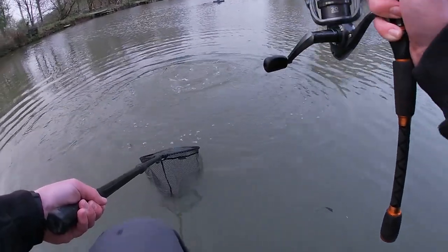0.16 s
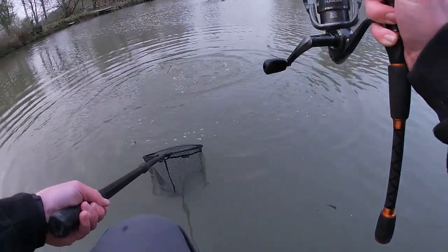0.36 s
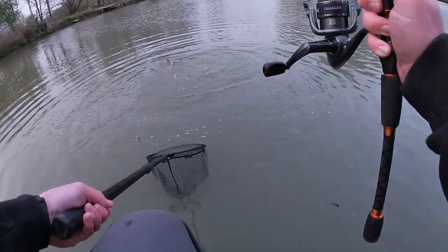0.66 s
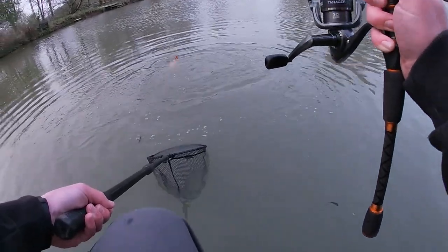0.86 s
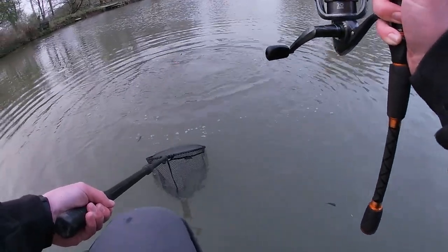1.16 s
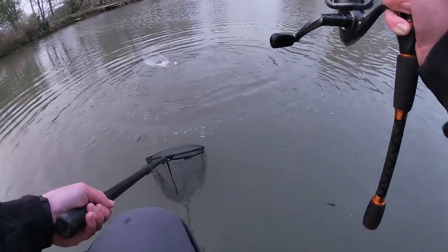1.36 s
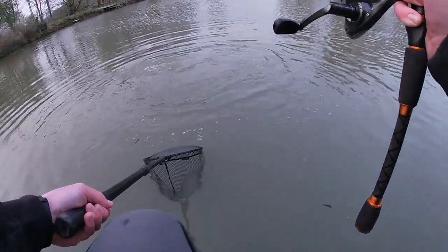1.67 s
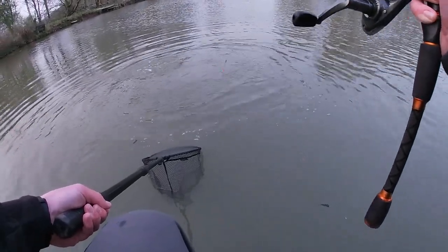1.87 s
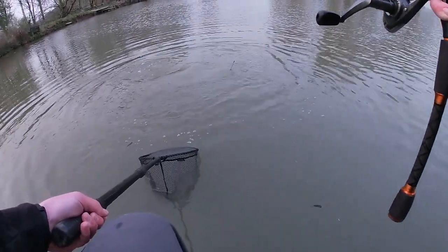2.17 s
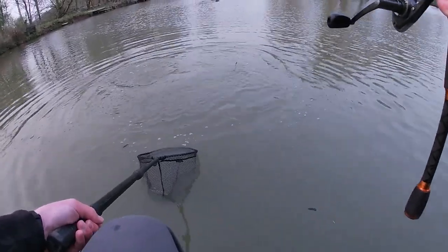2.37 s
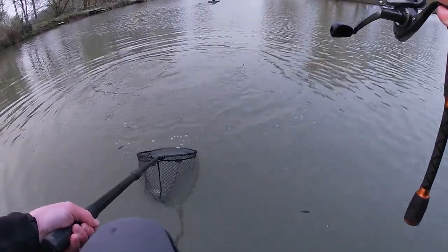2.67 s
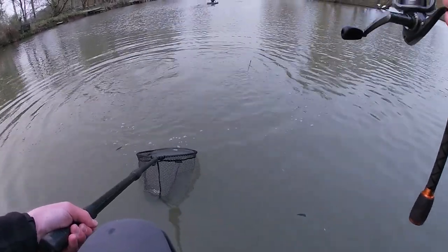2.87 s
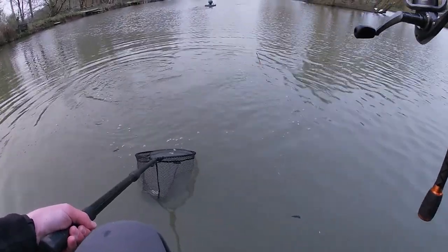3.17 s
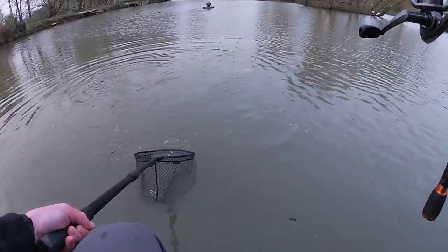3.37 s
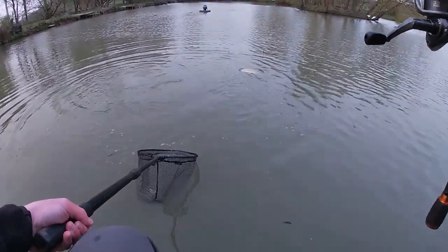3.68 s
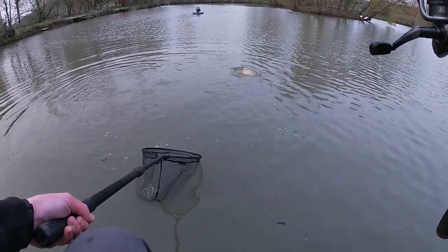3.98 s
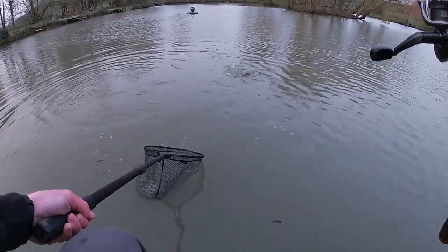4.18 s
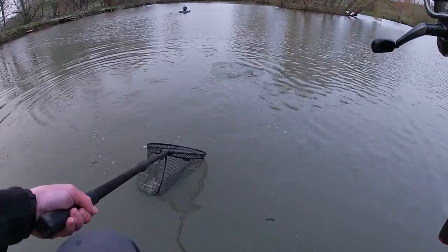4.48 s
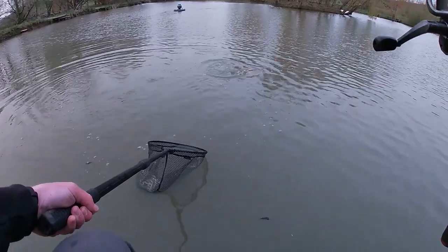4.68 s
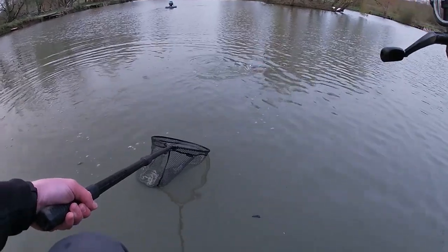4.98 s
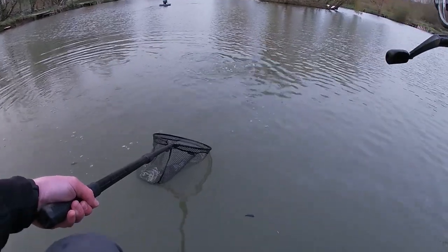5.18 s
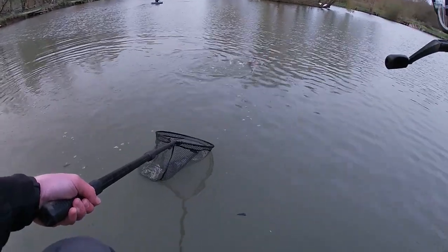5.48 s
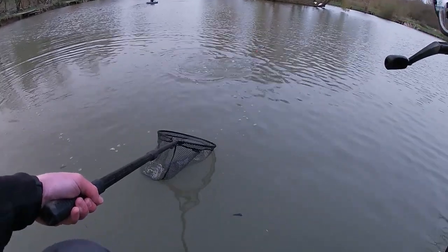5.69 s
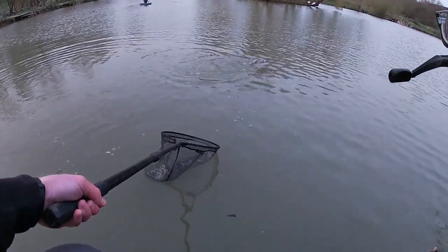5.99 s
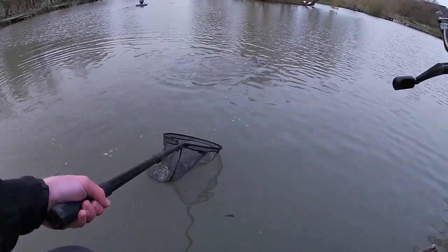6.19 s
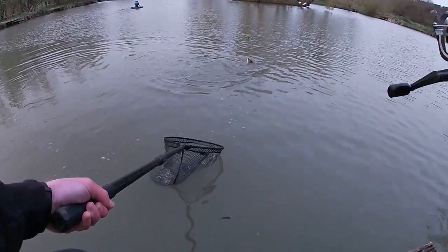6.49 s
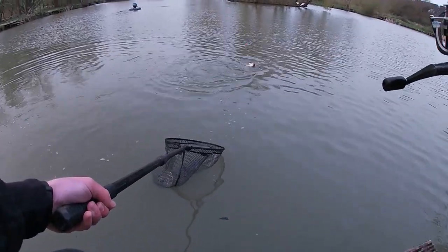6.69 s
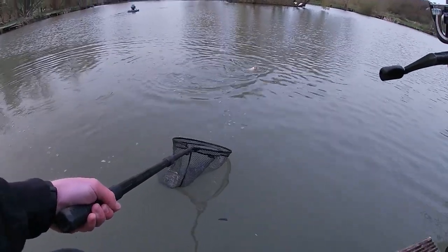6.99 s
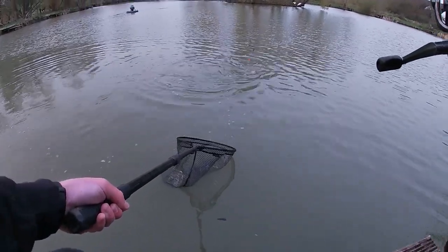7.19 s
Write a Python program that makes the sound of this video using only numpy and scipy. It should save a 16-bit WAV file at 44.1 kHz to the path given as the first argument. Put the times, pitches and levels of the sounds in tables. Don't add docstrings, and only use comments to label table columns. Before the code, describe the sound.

A lakeside heard from a chest-worn microphone, with a low, steady rumble of far traffic, soft tyre roar, wavering engine drones and a very faint electronic ticking. At 0-0.3 s light flicks throw bright spray and pattering droplets, thinning to a few drops. A mild breeze presses around 1.1 s. At 1.4-1.7 s the fish rolls: a heavy wet slosh, churn and low bubbly gulps, then ripples fade. From 1.75 to 3.9 s it is calm, with faint, quick, high warbler whistles and a soft wind push near 2.5 s. At 4.05-4.15 s sharp flat slaps crack out, followed by droplets and plunks at 4.5 and 4.8 s. The reel drag purrs quietly at 4.9-5.2 s. More splashes follow, with a deep hollow plop at 5.5 s. From 5.9 s drips dwindle, a distant thrush calls, and strong gusts flutter and thump the microphone, strongest at 6.2-6.5 s, easing by 7.3 s.

```python
import sys
import numpy as np
from scipy import signal
from scipy.fft import rfft, irfft, next_fast_len
from scipy.io import wavfile
from scipy.ndimage import uniform_filter1d, map_coordinates

SR = 44100
rng = np.random.default_rng(int(sys.argv[2]) if len(sys.argv) > 2 else 0)


def makeup_ratio(level_db):
    decades = np.asarray(level_db, float) / 20
    return 10 ** decades


def store_wav(level_fs):
    pcm = np.round(np.clip(np.atleast_2d(level_fs), -1, 1) * 32767)
    wavfile.write(sys.argv[1], SR, pcm.T.astype(np.int16))


N = 323694


def unit(x):
    return x / np.sqrt(np.mean(x ** 2) + 1e-20)


def curves(rows, silent=-120):
    s, *cols = np.transpose(rows)
    return [np.interp(np.arange(N) / SR, s, c, silent, silent) for c in cols]


def wobble(rate_hz):
    knots = rng.standard_normal(int(N * rate_hz / SR) + 4)
    return map_coordinates(knots, [np.arange(N) * rate_hz / SR])


def coloured(x, spectrum):
    m = 2 * next_fast_len(N // 2 + 4096)
    f, db = np.transpose(spectrum)
    log_f = np.log(np.fft.rfftfreq(m, 1 / SR) + 1)
    gain = makeup_ratio(np.interp(log_f, np.log(f + 1), db))
    cepstrum = irfft(np.log(gain + 1e-6), m)
    cepstrum[1:m // 2] *= 2
    cepstrum[m // 2 + 1:] = 0
    response = np.exp(rfft(cepstrum))
    return unit(irfft(rfft(x, m) * response, m)[:N])


def rush(spectrum, patchy_db):
    z = signal.stft(rng.standard_normal(N), nperseg=512)[2]
    field = uniform_filter1d(rng.standard_normal(z.shape), 5, 0)
    field = uniform_filter1d(field, 10, 1)
    noise = signal.istft(z * makeup_ratio(patchy_db * unit(field)), nperseg=512)[1][:N]
    return coloured(noise, spectrum)


def bubbles(s, size, hz, t60, rise, onset, length):
    t = np.arange(length) / SR
    life = np.abs(t60)[:, None] + 1e-4
    phase = 2 * np.pi * hz[:, None] * (t + rise * t * t / life)
    swell = 1 - np.exp(-t * hz[:, None] / onset)
    ring = size[:, None] * np.sin(phase) * makeup_ratio(-60 * t / life) * swell
    at = np.round(s * SR).astype(int)[:, None] + np.arange(length)
    return np.bincount(at.ravel(), ring.ravel(), N + length)[:N]


def fizz(spectrum, count, hz, cycles, spread_db, wash, length):
    u = rng.random(count)
    z = rng.standard_normal((count, 2))
    e = rng.exponential(size=count)
    pitch = np.clip(hz * np.exp(0.522 * z[:, 0]), 100, 15000)
    t60 = cycles / pitch * np.exp(0.36 * z[:, 1])
    size = makeup_ratio(spread_db * np.minimum(e, 3))
    swarm = bubbles(u * N / SR, size, pitch, t60, 0.33, 1.37, length)
    return coloured(unit(swarm) + wash * rng.standard_normal(N), spectrum)


def swells(s, length, db, rise, fall):
    t = np.arange(0, N + 32, 32)[None] / SR - np.asarray(s)[:, None]
    hold = np.abs(length)[:, None]
    before = np.maximum(-t, 0) / (rise + 0.35 * hold)
    after = np.maximum(t - hold, 0) / (fall + hold)
    level_db = np.asarray(db)[:, None] - 20 * (before + after)
    gain = np.sqrt(np.sum(makeup_ratio(2 * level_db), axis=0))
    return np.interp(np.arange(N) / 32, np.arange(len(gain)), gain)


def echoes(x, t60):
    tail = rng.standard_normal(SR // 2) * makeup_ratio(-60 * np.arange(SR // 2) / SR / t60)
    return signal.fftconvolve(np.pad(x, (600, 0)), tail / np.linalg.norm(tail))[:N]


# t/s, level/dB
ROAD = [(0, -54), (0.8, -56.5), (1.2, -60.5), (2.1, -60), (2.6, -56.5), (3.3, -59), (4.65, -57.5),
        (5.9, -54.5), (6.8, -62), (7.1, -56), (7.34, -58)]
# f/Hz, level/dB per Hz
RUMBLE = [(24, -21.5), (40, -10.5), (76, -5), (108, -6.5), (151, -5.5), (244, -11.5), (277, -15.5),
          (650, -33), (840, -51), (1430, -120)]
ROAR = [(260, -29.5), (450, -34.5), (670, -5), (880, -1), (1600, -3.5), (2580, -19), (2900, -22.5),
        (3770, -59), (6380, -120)]
HISS = [(1470, -14), (2500, -43.5), (2630, -10), (2950, -7), (4290, -5), (6110, -1.5), (8450, -17.5),
        (10000, -15.5), (14000, -33.5)]
# t/s, f/Hz, level/dB
ENGINES = [
    [(0, 77.95, -45), (1.3, 72.7, -44.5), (2.0, 76.8, -50), (3.2, 75.2, -63)],
    [(1.9, 163.4, -53.5), (2.6, 162.6, -60.5), (3.6, 145.7, -54), (4.6, 160.4, -51.5), (5.7, 164.4, -57)],
]


def road():
    roar_db, = curves(ROAD)
    leaving = makeup_ratio(-66 - 5.5 * np.arange(N) / SR)
    rumble_gain = np.hypot(makeup_ratio(-46.5), makeup_ratio(18) * leaving)
    hiss_gain = np.hypot(makeup_ratio(-74), leaving)
    far = rumble_gain * rush(RUMBLE, patchy_db=0.5)
    far += makeup_ratio(roar_db) * rush(ROAR, patchy_db=1.5)
    far += hiss_gain * makeup_ratio(0.8 * wobble(30)) * rush(HISS, patchy_db=0.5)
    for hz, db in map(curves, ENGINES):
        gain = makeup_ratio(db + 3 + 3 * wobble(10))
        unsteady_hz = hz * (1 + 0.022 * wobble(10))
        far += gain * np.sin(2 * np.pi * np.cumsum(unsteady_hz) / SR)
    return far


# t/s, level/dB
BREEZE = [(0, -66), (0.9, -51), (1.15, -41.5), (1.6, -62), (2.2, -60), (2.45, -43), (2.65, -48), (3.2, -68),
          (5.4, -57), (5.85, -43.5), (6.6, -37), (7.34, -52)]
# f/Hz, level/dB per Hz
BUFFET = [(8.8, -36.5), (15, -2.5), (59, 0.5), (118, -5), (140, -24.5), (178, -10), (250, -37.5),
          (320, -52), (550, -120)]
FLUTTER = [(82, -36.5), (140, 4.5), (214, -8), (248, -7), (700, -39.5), (910, -62), (1540, -120)]
# t/s, length/s, buffet level/dB, flutter over buffet/dB
PUFFS = [(5.916, 0.054, -35, -7.5), (6.083, 0.011, -51, 7), (6.192, 0.11, -28.5, -3),
         (6.431, 0.013, -34, -1.5), (6.488, 0.069, -28, -8), (6.814, 0.0028, -32, 1), (6.89, 0.1, -40, -6),
         (7.067, 0.0075, -41, -23)]
# t/s, peak level/dB, f/Hz
THUMPS = [(6.175, -23, 111), (6.213, -21, 124), (6.231, -22, 90), (6.279, -28, 71), (6.362, -25.5, 85),
          (6.428, -27.5, 212), (6.462, -20, 62), (6.518, -18, 68), (6.644, -30, 150), (6.795, -34, 111),
          (6.816, -28, 170)]


def wind():
    s, length, db, sharp_db = np.transpose(PUFFS)
    buffet_gain = np.hypot(swells(s, length, db, rise=0.038, fall=0.026), makeup_ratio(curves(BREEZE)[0]))
    eddies = makeup_ratio(1.3 * wobble(13)) * rush(BUFFET, patchy_db=1.0)
    push = eddies ** 2
    lumps = unit(eddies + 0.095 * (push - uniform_filter1d(push, size=2000)))
    flaps = unit(makeup_ratio(4.5 * wobble(40)) * rush(FLUTTER, patchy_db=-0.5))
    flap_gain = swells(s, length / 2, db + sharp_db, rise=0.022, fall=0.032)
    at, peak_db, hz = np.transpose(THUMPS)
    thumps = bubbles(at, makeup_ratio(peak_db + 3.5), hz, 6.9 / hz, rise=-0.1, onset=0.23, length=5000)
    return thumps + buffet_gain * lumps + flap_gain * flaps


# f/Hz, level/dB per Hz
CHURN = [(110, -24), (180, -20), (371, -7), (405, -2.5), (453, -10), (800, -26), (1040, -77), (1760, -120)]
SLOSH = [(250, -23), (520, -8.5), (861, -15.5), (1540, -6), (2150, -9), (2570, -21), (2700, -8.5),
         (3510, -70), (5940, -120)]
SPRAY = [(1470, -47), (2500, -13), (2580, -31), (2850, -10.5), (3190, -4), (3870, -14), (5210, -13.5),
         (6070, -6.5), (6910, -18.5), (10100, -25.5), (11400, -35), (14200, -39), (15500, -41.5)]
# t/s, length/s, slosh level/dB, spray over slosh/dB
FLICKS = [(0.004, 0.019, -46.5, -6), (0.043, 0.058, -50.5, 6), (0.144, 0.021, -45.5, -3.5),
          (1.379, 0.0064, -54, -18), (1.45, 0.021, -32.5, -18.5), (1.475, 0.036, -36, -7.5),
          (1.564, 0.039, -37.5, -6.5), (1.63, 0.046, -46, -3.5), (1.734, 0.024, -56, -1),
          (4.061, 0.011, -34, -17.5), (4.05, .003, -39, -13), (4.095, 0.0055, -33, -5),
          (4.135, 0.0039, -37, -2.5), (4.153, 0.002, -35.5, -2.5), (4.2, 0.0033, -69, -1),
          (4.298, 0.053, -56, -2), (4.431, 0.0069, -46, -9), (4.469, 0.0022, -62, 9),
          (4.796, 0.065, -46, -11), (5.118, 0.053, -46.5, -6.5), (5.258, 0.0055, -53, -11),
          (5.289, 0.0024, -55.5, 13.5), (5.471, 0.0056, -35.5, -10), (5.504, 0.071, -44.5, -12),
          (5.634, 0.022, -51, 0.5)]
# t/s, length/s, churn level/dB
ROLLS = [
    (1.476, 0.058, -34.5),
    (1.574, 0.027, -43.5),
]


def thrashing():
    rise_s, fall_s, ripple_fall_s = 0.005, 0.02, 0.66
    s, length, db, bright_db = np.transpose(FLICKS)
    ripples = swells(s, length, -60 + 0 * db, rise_s, ripple_fall_s)
    slosh_gain = np.hypot(swells(s, length, db, rise_s, fall_s), ripples)
    spray_gain = np.hypot(swells(s, length, db + bright_db, rise_s, fall_s), makeup_ratio(-5) * ripples)
    churn = makeup_ratio(-3) * swells(*np.transpose(ROLLS), rise=0.005, fall=0.05)
    churn *= fizz(CHURN, count=800, hz=450, cycles=20, spread_db=1.2, wash=1.2, length=2500)
    slosh = slosh_gain * makeup_ratio(-2.5 + 1.5 * wobble(60))
    slosh *= fizz(SLOSH, count=4500, hz=1500, cycles=16, spread_db=2.5, wash=1.3, length=600)
    spray = spray_gain * makeup_ratio(-2.5 + 2 * wobble(70))
    spray *= fizz(SPRAY, count=10000, hz=5000, cycles=16, spread_db=3.5, wash=0.9, length=220)
    return churn + slosh + spray


# t/s, peak level/dB, f/Hz
GLINTS = [(0.0114, -62, 9560), (0.1204, -41, 9720), (0.138, -44, 9740), (0.1724, -52, 9990),
          (0.191, -44, 9420), (0.2204, -59, 9400), (0.4714, -65, 9630), (1.1383, -58, 9530),
          (4.4124, -74, 9770), (4.585, -69, 9730), (5.0135, -64, 9450), (5.1317, -53, 9880),
          (5.2535, -53, 9810), (5.5787, -59, 9280), (5.6705, -59, 9780), (5.7229, -63, 9830),
          (5.7394, -63, 9820), (5.9324, -57, 10100), (6.0427, -68, 9840)]
# t/s, peak level/dB, f/Hz
PATTER = [(0.015, -41.5, 3540), (0.071, -31, 3260), (0.139, -35, 5900), (0.171, -38, 5700),
          (0.281, -44, 2940), (0.351, -45, 2980), (0.457, -49, 3060), (1.175, -46.5, 1830),
          (4.822, -45, 5400), (5.424, -48, 6700),
          (1.3724, -34, 5300), (1.3934, -38.5, 3150), (1.46, -37, 3440), (1.4723, -24.5, 3140),
         (1.5524, -31, 3160), (1.568, -28, 3260), (1.6217, -35, 2850), (1.879, -48, 3800),
         (4.079, -29, 3560), (4.1001, -20.5, 3070), (4.1322, -30, 3380), (4.3018, -29, 2790),
         (4.453, -40, 3440), (4.477, -30, 2730), (4.645, -41.5, 4280), (4.7912, -40.5, 5700),
         (4.8365, -27.5, 5120), (5.0445, -37, 2770), (5.16, -37, 6170), (5.2167, -33.5, 3830),
         (5.2776, -36, 4470), (5.294, -39.5, 3280), (5.446, -30.5, 5670), (5.4734, -36, 4070),
         (5.6383, -37.5, 2700), (5.774, -44.5, 5300), (6.5766, -45, 2860), (6.8913, -35, 5200),
         (5.835, -50, 3080), (7.155, -49, 4600),
          (0.39, -53, 3310), (0.4214, -55, 3290), (4.296, -40, 3000), (4.33, -38, 3330), (4.366, -46, 2800),
          (4.489, -43, 3430), (4.854, -40, 2900), (4.8826, -44, 2820), (5.1992, -42, 3230),
          (5.5488, -39, 2880), (5.5712, -41, 3040), (5.6514, -39, 2850), (5.9274, -51, 4170),
          (6.301, -57, 3480),
          (0.091, -42, 5640), (0.104, -37, 6200), (1.844, -44, 5810), (3.7993, -55, 5930),
         (4.3181, -54, 5920), (4.3385, -45, 6090), (4.4119, -50, 7150), (4.4254, -59, 5650),
         (4.5441, -62, 5960), (4.5874, -50, 6320), (4.9947, -52, 6110), (5.1796, -46, 5930),
         (5.3368, -54, 5570), (5.5154, -46, 5890), (5.5303, -49, 6350), (5.7324, -49, 7330),
         (5.7498, -54, 5570), (5.7977, -61, 5590), (5.8985, -48.5, 5770), (6.0013, -53, 5250),
         (6.102, -51, 5760), (6.2546, -54, 5940), (6.901, -53, 5570), (7.0474, -65, 5630)]


def droplets():
    s, db, hz = np.transpose(PATTER + GLINTS)
    ring = bubbles(s, makeup_ratio(db + 4), hz, 30 / hz, rise=0.08, onset=1.1, length=1500)
    crack = bubbles(s, makeup_ratio(db - 1), 1.35 * hz, 7 / hz, rise=0, onset=0.3, length=200)
    twin_hz = hz * (1.12 + 0.2 * rng.random(len(s)))
    twin = bubbles(s + 0.0006, makeup_ratio(db - 4), twin_hz, 22 / twin_hz, rise=0.1, onset=1.1, length=1500)
    return ring + crack + twin


def shutter():
    rate_hz, first_s, slip_s, ring_s = 30, 0.029, 0.0035, 0.012
    z = rng.standard_normal((int(N / SR * rate_hz) - 1, 2))
    s = first_s + np.arange(len(z)) / rate_hz + slip_s * np.clip(z[:, 0], -2, 2)
    beats = np.bincount(np.round(s * SR).astype(int), makeup_ratio(2.6 * z[:, 1]), N)
    decay = makeup_ratio(-60 * np.arange(600) / SR / ring_s)
    rasps = np.convolve(beats, decay)[:N] * rng.standard_normal(N)
    return makeup_ratio(-82) * coloured(rasps, [(5000, -48), (6200, -3), (7000, 2), (8000, -4.5), (9500, -51)])


# t/s, peak level/dB, f/Hz
DROPS = [(0.061, -34.5, 1950), (0.131, -37.5, 1670), (0.261, -37, 1320), (0.281, -36.5, 1400),
         (0.675, -40, 1650), (0.828, -41.5, 1950), (1.386, -39, 1540), (1.492, -24, 1450),
         (1.532, -34, 1460), (1.703, -46, 1320), (1.732, -46, 1990), (1.745, -44, 2060),
         (1.455, -24.5, 1370), (1.472, -25.5, 1485), (1.591, -27, 1640), (1.962, -49, 2130),
         (4.061, -20.5, 820), (4.302, -36, 1340), (4.404, -37.5, 2250), (4.487, -38, 850),
         (4.425, -44, 2200), (4.722, -44, 2240), (4.791, -38, 1440), (4.838, -34, 1320),
         (5.126, -31.5, 1410), (5.153, -31, 1230), (5.249, -42, 2030), (5.585, -28.5, 1156),
         (5.657, -36.5, 2160), (5.899, -43, 1980), (5.95, -36.5, 1380), (4.445, -41, 1860),
         (4.457, -39, 960), (4.563, -46, 2040), (4.816, -37, 1190), (5.508, -45, 1600), (5.694, -42, 2020)]
# t/s, peak level/dB, f/Hz
SLAPS = [(1.398, -28.5, 1230), (3.916, -33.5, 1130), (4.0588, -15, 1350), (4.158, -38, 1430),
         (4.131, -21, 1700), (4.14, -10, 1980), (4.1481, -19.5, 1330), (4.209, -37, 2150),
         (5.37, -34, 1750), (5.447, -32, 1350), (5.474, -22, 770), (6.033, -32.5, 1230), (6.11, -43, 2780)]
# t/s, peak level/dB, f/Hz
DRIPS = [(4.771, -36.5, 777), (5.287, -41, 1464), (5.588, -57, 4100), (5.762, -46, 1410),
         (6.341, -40, 1277)]


def plops():
    s, db, hz = np.transpose(DROPS + SLAPS + DRIPS)
    ring_s = np.repeat([0.033, 0.014, 0.091], [len(DROPS), len(SLAPS), len(DRIPS)])
    return bubbles(s, makeup_ratio(db - 1.0), hz, ring_s, rise=0.13, onset=0.12, length=3000)


# t/s, peak level/dB
TICKS = [(0.0747, -43), (0.1091, -44), (0.1898, -69), (1.727, -44), (4.0825, -39), (4.4638, -37),
         (4.4768, -37.5), (5.225, -45), (5.367, -51.5), (6.7298, -55)]


def spray_ticks():
    ticks = np.zeros(N)
    for s, db in TICKS:
        decay = makeup_ratio(db - 60 * np.arange(300) / SR / 0.01)
        ticks[round(s * SR):][:300] = decay * rng.standard_normal(300)
    rms = np.sqrt(np.mean(ticks ** 2))
    return makeup_ratio(1.0) * rms * coloured(ticks, [(2000, -32)] + SPRAY[6:])


# t/s, length/s, start f/Hz, end f/Hz, level/dB
WARBLE = [(0.59, 0.052, 3400, 4500, -69), (1.75, .05, 3480, 4080, -58), (1.806, .02, 3400, 3770, -63),
          (2.8, .045, 4250, 4480, -70), (2.878, .016, 4600, 5150, -69), (2.79, .06, 3400, 3280, -73),
          (2.899, 0.042, 3490, 4000, -63), (2.545, .057, 3350, 4000, -73), (2.63, .014, 3950, 3550, -72),
          (2.738, .022, 4700, 4650, -70), (2.787, .015, 4800, 4500, -71), (2.89, .01, 5050, 4400, -72),
          (2.975, .02, 4300, 3700, -71), (3.0, .016, 3400, 3250, -69), (3.045, .055, 4100, 4550, -71),
          (3.455, .022, 5500, 5510, -65), (3.522, .014, 3200, 2900, -68), (3.63, .045, 3300, 3150, -71),
          (3.675, .04, 3200, 3000, -68), (2.945, .02, 3500, 3900, -68), (3.061, 0.021, 2920, 3570, -66.5),
          (3.057, .014, 3600, 4100, -65), (3.085, 0.125, 3630, 3655, -67.5), (3.18, .065, 4300, 3900, -72),
          (3.306, .04, 3650, 4000, -72), (3.32, 0.035, 4450, 4500, -65), (6.465, .035, 3750, 4080, -66),
          (6.512, .045, 3350, 3250, -71), (3.878, .014, 2800, 3300, -67), (3.91, .04, 3000, 3150, -69),
          (3.482, .018, 4060, 4040, -65), (3.5, .023, 3900, 3550, -66), (3.765, .026, 4170, 3930, -60),
          (3.79, .022, 3800, 3750, -60), (3.812, .028, 3400, 2780, -59)]
# length/s, start f/Hz, middle f/Hz, end f/Hz
ARCH = (.1, 2320, 2960, 2380)
HIGH_ARCH = (.095, 3350, 3650, 3500)
FALL = (.045, 2330, 2170, 1920)
# t/s, figure, level/dB
THRUSH = [(5.949, ARCH, -64), (6.021, HIGH_ARCH, -67), (6.178, FALL, -62), (6.327, ARCH, -64.5),
          (6.405, HIGH_ARCH, -62.5), (6.687, FALL, -65.5), (6.825, ARCH, -68.5), (7.194, FALL, -69)]
# t/s, length/s, level/dB
HAZE = [
    (2.8, 0.94, -76.5),
    (3.63, .08, -71),
    (3.84, 0.14, -67.5),
]


def birds():
    song = []
    for s, length, start, end, db in WARBLE:
        middle = (start + end) / 2 + 0.085 * abs(end - start)
        song.append((s, length, [start, middle, end], db, False))
    for s, (length, *pitch_hz), db in THRUSH:
        song.append((s, length, pitch_hz, db, True))
    out = np.zeros(N)
    for s, length, pitch_hz, db, eased in song:
        u = np.linspace(0, 1, int(length * SR))
        if eased:
            glide_hz = map_coordinates(np.array(pitch_hz, float), [2 * u], mode="mirror")
        else:
            glide_hz = np.polyval(np.polyfit([0, 0.5, 1], pitch_hz, 2), u)
        gain = makeup_ratio(db + 4.5) * np.sqrt(np.sin(np.pi * u) + 1e-9)
        out[round(s * SR):][:len(u)] += gain * np.sin(2 * np.pi * np.cumsum(glide_hz) / SR)
    out *= makeup_ratio(2.5 * wobble(120))
    smeared = echoes(out * wobble(300), t60=0.7)
    haze = swells(*np.transpose(HAZE), rise=0.18, fall=0.1)
    haze *= rush([(2600, -34.5), (3050, -5), (4150, -1), (4800, -44)], patchy_db=5.0)
    return out + makeup_ratio(-4.5) * smeared + haze


# t/s, peak level/dB, f/Hz, t60/s
GULPS = [(1.463, -30, 542, 0.082), (1.474, -26.5, 427, 0.11), (1.494, -27, 598, 0.038),
         (1.55, -38, 420, .1), (1.62, -41, 385, 0.27), (1.515, -28, 330.5, 0.19), (1.593, -30, 433, 0.068),
         (1.69, -39.5, 384, 0.09), (4.1, -30.5, 211, 0.16), (4.146, -32, 200.5, 0.18),
         (4.478, -25.5, 398.5, 0.14), (4.814, -19.5, 321, 0.052), (5.137, -37, 563, 0.15),
         (5.475, -12, 271, 0.029), (5.945, -33, 264.3, 0.2)]
# t/s, peak level/dB, f/Hz, t60/s, pitch rise/share
WHOOPS = [(4.27, -40.5, 2000, .07, .5), (4.627, -47, 1550, 0.072, 0.57), (1.9, -45, 1100, 0.19, 2),
          (4.093, -27, 1380, 0.037, 1.16), (5.49, -45, 768, 0.31, 0.39), (5.548, -44, 883, .15, 1.5),
          (5.492, -34.5, 294, .3, 1), (5.575, -37, 810, 0.052, 0.88)]


def air_pockets():
    gulps = [(*row, 0.3) for row in GULPS]
    s, db, hz, t60, rise = np.transpose(gulps + WHOOPS)
    return bubbles(s, makeup_ratio(db + 0.5), hz, t60, rise[:, None], onset=0.25, length=8000)


def drag():
    start_s, length_s = 4.9, 0.33
    surge = np.sin(np.pi * np.clip((np.arange(N) / SR - start_s) / length_s, 0, 1)) ** 2
    rate_hz = 53 + 47 * surge + 40 * wobble(90)
    clicks = np.diff(np.floor(np.cumsum(np.abs(rate_hz)) / SR), prepend=0)
    clicks = unit(clicks * makeup_ratio(3 * wobble(80))) + 0.8 * rng.standard_normal(N)
    run = swells([start_s], [length_s], [-54.5], rise=0.01, fall=0.01) * (surge > 0)
    pawl = [(900, -53), (1500, -2), (1950, 14.5), (2300, 2.5), (2900, 2.0), (3800, -58.5)]
    return run * coloured(clicks, pawl)


def scene():
    fish = thrashing() + droplets() + plops() + spray_ticks() + air_pockets()
    around = road() + wind() + shutter() + birds() + drag()
    return (fish + makeup_ratio(-16.5) * echoes(fish, t60=0.082) + around)[None]


# t/s, lost/share
STARVED = [(2.11, .7), (2.745, .6), (3.15, .65), (3.462, .98), (3.985, .5), (6.37, .65), (6.875, .8),
           (7.012, .7)]


def starve(x, from_hz=2300, keep=1.87, size=2048):
    out = x.copy()
    high = np.fft.rfftfreq(size, 1 / SR) > from_hz
    for s, lost in STARVED:
        middle = round(s * SR)
        at = slice(middle - size // 2, middle + size // 2)
        z = rfft(x[0, at] * np.hanning(size))
        weak = np.abs(z) < keep * uniform_filter1d(np.abs(z), size=40)
        out[0, at] -= lost * irfft(z * weak * high, size)
    return out


def top_cut(x):
    return signal.sosfilt(signal.butter(12, 15690, fs=SR, output="sos"), x)


def record(dry):
    mix = starve(dry)
    return top_cut(mix)


dry = scene()
out = record(dry)
store_wav(out)
```